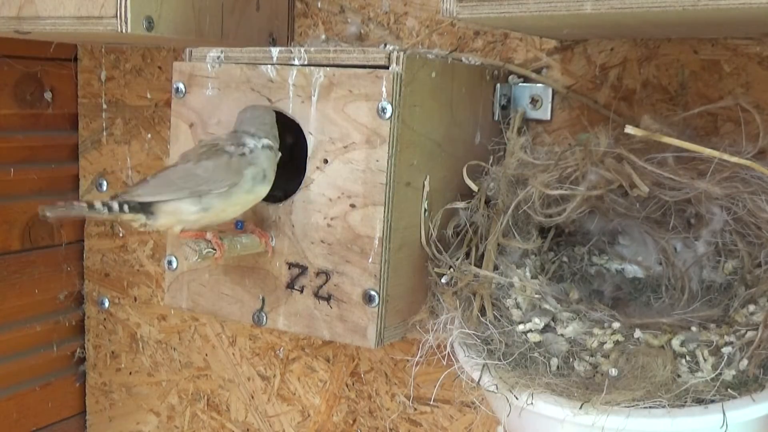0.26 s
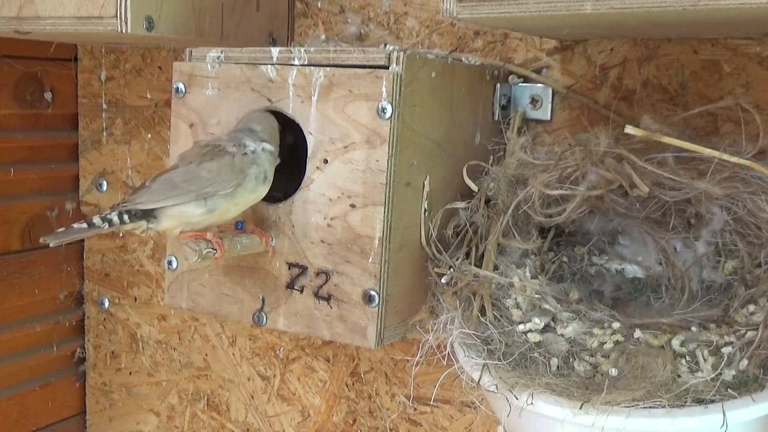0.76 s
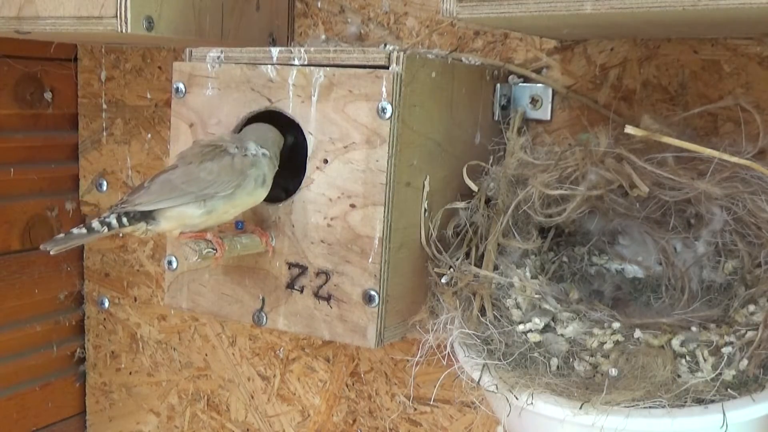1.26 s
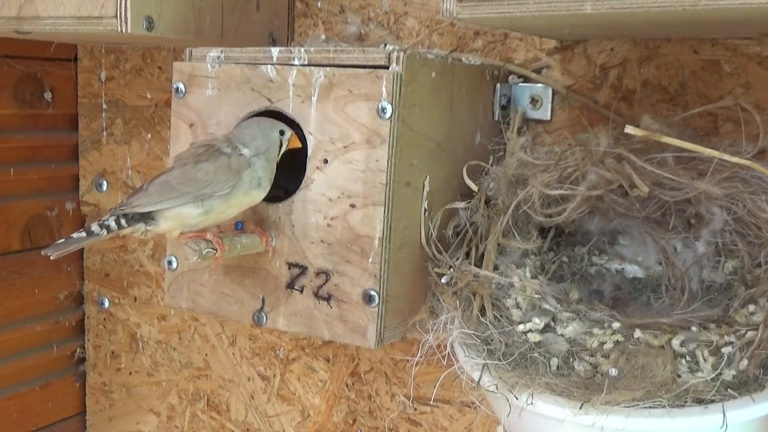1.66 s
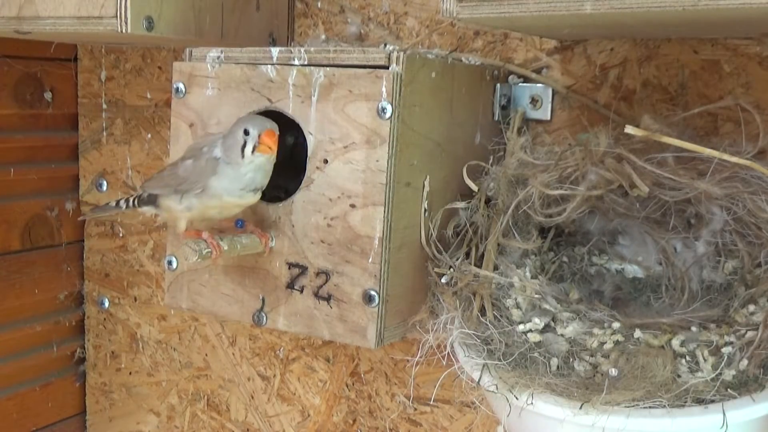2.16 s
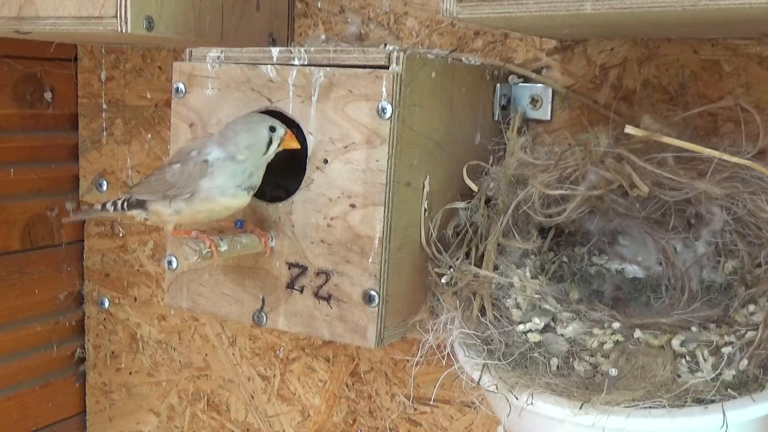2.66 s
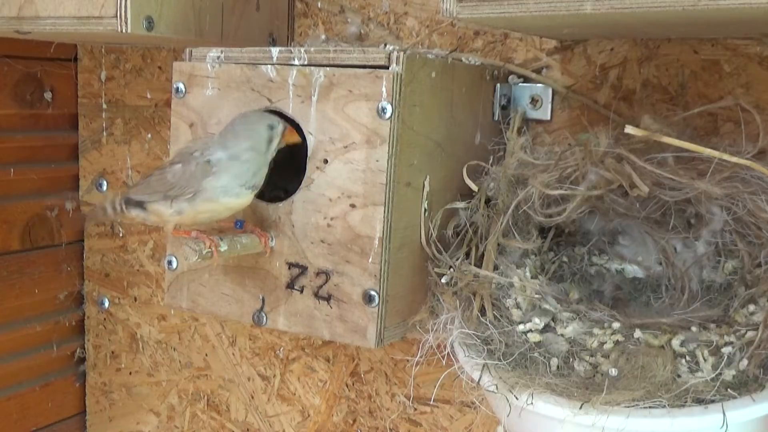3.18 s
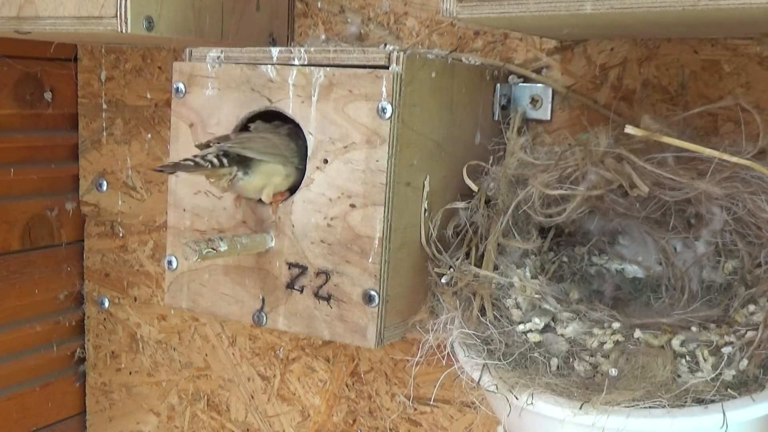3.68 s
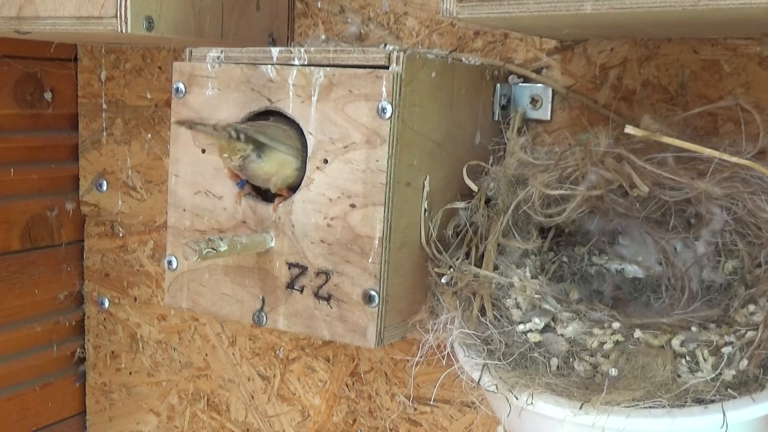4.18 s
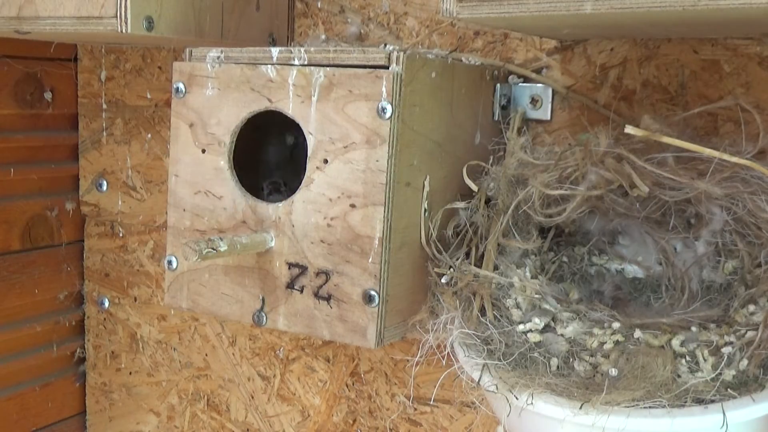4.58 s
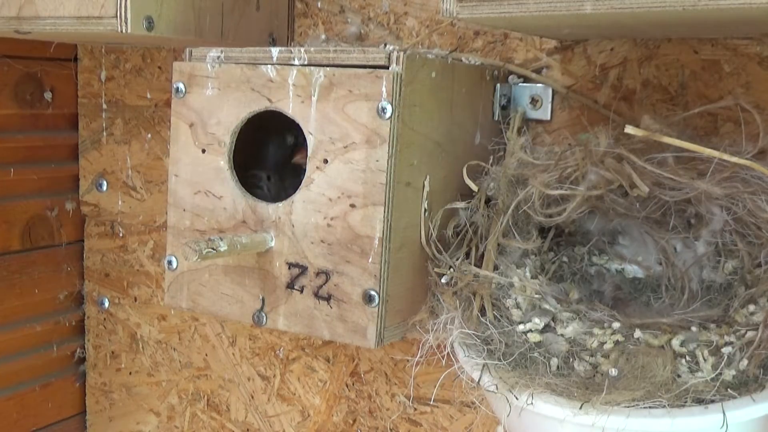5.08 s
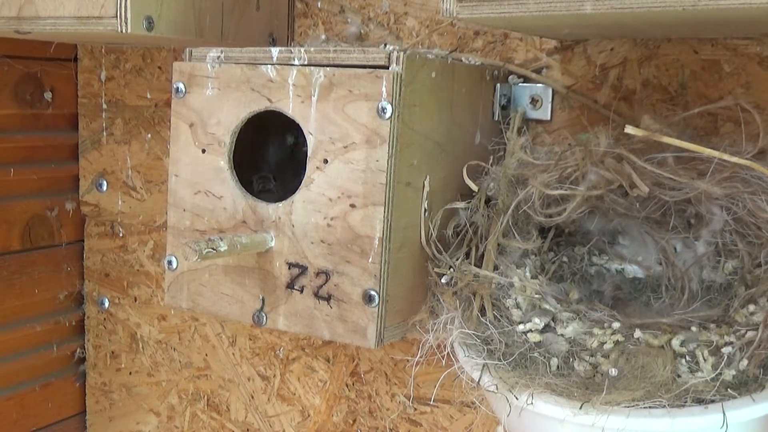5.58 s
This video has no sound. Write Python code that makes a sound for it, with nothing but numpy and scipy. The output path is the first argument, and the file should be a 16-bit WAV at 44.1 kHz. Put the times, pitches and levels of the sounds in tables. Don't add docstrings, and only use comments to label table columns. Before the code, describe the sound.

Close stereo pickup of small finches indoors: a broken two-step cry early, ragged low squawks, tiny peeps, then a sharp burst of shrieks and scolds midway. Raspy chick begging pulses almost throughout. Straw scuffs and woody ticks accompany a bird entering a nest box, followed by nasal calls, a clear drawn-out buzz and a falling reedy whistle. Low fan hum and blurred distant birds stay underneath.

```python
import sys
import numpy as np
from scipy import signal
from scipy.fft import rfft, irfft, next_fast_len
from scipy.io import wavfile
from scipy.ndimage import uniform_filter1d

SR = 44100
rng = np.random.default_rng(int(sys.argv[2]) if len(sys.argv) > 2 else 0)


def amp(db):
    return 10 ** (np.asarray(db, float) / 20)


def write(x):
    x = np.atleast_2d(x).T
    wavfile.write(sys.argv[1], SR, np.round(np.clip(x, -1, 1) * 32767).astype(np.int16))


N = 257544


def evened(x):
    return x / np.sqrt(np.mean(x ** 2) + 1e-20)


def read(points, hz):
    f, value = np.transpose(points)
    return np.interp(np.log(hz + 1), np.log(f + 1), value)


def colour(x, points):
    size = next_fast_len(len(x))
    gain = amp(read(points, np.fft.rfftfreq(size, 1 / SR)))
    return irfft(rfft(x, size) * gain, size)[:len(x)]


def wobble(n, hz):
    span = max(int(SR / hz / 2), 1)
    smooth = uniform_filter1d(uniform_filter1d(rng.standard_normal(9000), span), span)
    return evened(smooth)[np.arange(n) % 9000]


def swell(length, rise, fall):
    n = max(int(length * SR), 50)
    u = np.arange(n) / n
    return np.sin(np.pi / 2 * np.clip(np.minimum(u / rise, (1 - u) / fall), 0, 1)) ** 2, u


def perform(rows, voice, *settings):
    track = np.zeros(N)
    for start, *row in rows:
        sound = voice(*row, *settings)
        part = track[max(round(start * SR), 0):][:len(sound)]
        part += sound[:len(part)]
    return track


def patchy(points, patch_db, grain_db):
    frames = N // 128 + 5
    a, b, patches = rng.standard_normal((frames, 257, 3)).T
    patches = evened(uniform_filter1d(uniform_filter1d(patches, 5, 0), 16, 1))
    flicker = evened(uniform_filter1d(rng.standard_normal(frames), 4))
    z = (a + 1j * b) * amp(patch_db * patches + grain_db * flicker)
    noise = signal.istft(z, nperseg=512, noverlap=384)[1][:N]
    return evened(colour(noise, points))


def loudness(x):
    span = int(0.046 * SR)
    return np.sqrt(abs(uniform_filter1d(x ** 2, span, origin=span // 4)))


# frequency in Hz, density in dB per Hz.
AIR_SPECTRUM = [(5, 13), (10, -3), (80, -19), (125, -4.5), (185, -20.5), (770, -15.5), (1050, -11.5),
                (1500, -15), (2300, -32.5), (6000, -30.5), (15500, -75)]


def room_tone():
    return amp(-40) * patchy(AIR_SPECTRUM, 3.4, 0.98)


def fan_line(hz, width_hz):
    shape = ((-2, -50), (-.5, -6), (0, 0), (.5, -6), (2, -50))  # (widths from the centre, dB)
    return evened(colour(rng.standard_normal(N), [(hz + step * width_hz, db) for step, db in shape]))


# frequency in Hz, width in Hz, level in dB.
FAN_LINES = [(49.5, 14, -50), (23.53, 1.67, -41)]


def fan():
    t = np.arange(N) / SR
    sway_db = 3.5 * np.sin(2 * np.pi * t / 6.7 + 2.68)
    hum = amp(-48.5 + sway_db) * fan_line(135, 4.2)
    return hum + sum(amp(db) * fan_line(hz, width_hz) for hz, width_hz, db in FAN_LINES)


# frequency in Hz, density in dB per Hz.
STRAW_SPECTRUM = [(88, 1.5), (150, -15), (275, -5), (343, -15), (505, -3.5), (1050, -7), (1500, -14.5),
                  (1950, -9.5), (3300, -120)]
# middle in seconds, spread in seconds, straw level in dB,
# box boom level in dB.
SCUFFLES = [
    (.42, 0.19, -37.5, -48),
    (1.15, 0.16, -42, -61),
    (2.65, 0.094, -55, -42.5),
    (3.6, 0.11, -38.5, -67),
    (3.95, 0.3, -39, -40.5),
    (5.25, 0.13, -70, -57),
]


def nest_box():
    t = np.arange(N) / SR
    straw, boom = amp(-47.5), amp(-48.5)
    for middle, spread, straw_db, boom_db in SCUFFLES:
        move = np.exp(-((t - middle) / spread) ** 2)
        straw = straw + move * amp(straw_db)
        boom = boom + move * amp(boom_db)
    hollow = [(30, -24), (50, -1.0), (82, 12.5), (115, 2.0), (150, -25.5)]
    box = evened(colour(rng.standard_normal(N), hollow))
    return boom * box + straw * patchy(STRAW_SPECTRUM, 3.6, 2.6)


# frequency in Hz, density in dB per Hz.
FLOCK_SPECTRUM = [(820, -41), (1400, -20), (1890, 0.5), (3050, 5), (3760, 2.5), (5200, -2.5), (6760, 1),
                  (11400, -120)]
# time in seconds, level in dB.
UNREST = [(0, -43), (.2, -42), (.63, -42), (.77, -48), (1.1, -37.5), (1.3, -48.5), (1.57, -32.5),
          (1.9, -41), (2.13, -36.5), (2.55, -42), (3.35, -35.5), (4.54, -38.5), (4.6, -31), (4.75, -50),
          (5.0, -30), (5.55, -49.5), (5.84, -44)]


def far_flock(scolds):
    t = np.arange(N) / SR
    level = amp(np.interp(t, *np.transpose(UNREST))) + amp(-13.5) * loudness(scolds)
    return amp(-3.0) * level * patchy(FLOCK_SPECTRUM, 5.74, 1.1)


# frequency in Hz, density in dB per Hz.
FAR_CHICK_SPECTRUM = [(4000, -21), (5500, 3), (7500, 3.5), (10000, -2), (13500, -5), (15000, -26),
                      (15700, -32)]
PAUSES = [.64, .775, 1.555, 1.84, 2.56, 4.535, 5.54, 5.78]


def far_chicks(rasps, scolds):
    t = np.arange(N) / SR
    level = amp(-41) + amp(-18.5) * loudness(rasps) + amp(-18) * loudness(scolds)
    pauses = sum(np.exp(-((t - s) / 0.019) ** 2) for s in PAUSES)
    return amp(2.5) * level * amp(-20 * pauses) * patchy(FAR_CHICK_SPECTRUM, 5.0, 0.38)


def background(rasps, scolds):
    return room_tone() + fan() + nest_box() + far_flock(scolds) + far_chicks(rasps, scolds)


def chirp(length, first_hz, last_hz, db, favoured, rough, spread_db, floor_db, breath_db, rise=0.11):
    shape, u = swell(length, rise, 0.2)
    if last_hz > first_hz:
        glide = np.sin(np.minimum(u / 0.6, 1) * np.pi / 2)
    else:
        glide = u ** 1.555
    hz = first_hz + (last_hz - first_hz) * glide
    hz = hz * (1 - 0.074 * rough * np.exp(-u / 0.043))
    turns = np.cumsum(hz + rough * 75 * wobble(len(u), 200)) / SR
    k = np.arange(1, 7)[:, None]
    gain = amp(-np.minimum(spread_db * (k - favoured) ** 2, floor_db)) * (k * last_hz < 14300)
    chop = np.array([1 - .45 * rough + rough * wobble(len(u), 240 + .04 * n * first_hz) for n in k[:, 0]])
    tone = evened((gain * chop * np.cos(2 * np.pi * k * turns)).sum(0))
    breath_spectrum = [(1500, -35), (2500, 14.5), (12500, 21.0), (14500, -33)]
    breath = colour(rng.standard_normal(9000), breath_spectrum)[:len(u)]
    return amp(db) * shape * (tone + amp(breath_db) * breath)


# start in seconds, length in seconds, first pitch in Hz,
# last pitch in Hz, level in dB.
DISTANT = [
    (1.55, 0.02, 3260, 3300, -33),
    (.7, 0.026, 4140, 4160, -49),
    (2.208, 0.028, 3400, 3420, -31),
    (3.415, 0.038, 3480, 3260, -24.5),
    (4.6, 0.057, 3060, 3090, -37),
    (5.63, 0.09, 3480, 3030, -39),
    (5.7, 0.041, 2880, 2290, -39.5),
]


def distant_whistles():
    return perform(DISTANT, chirp, 0.2, 0.0, 9., 32, -30)


# start in seconds, length in seconds, first pitch in Hz,
# last pitch in Hz, level in dB.
SHRIEKS = [
    (1.735, 0.028, 3300, 2920, -33.5),
    (2.753, 0.038, 5900, 6200, -15),
    (2.823, 0.035, 6190, 6000, -13.5),
    (3.355, 0.062, 4470, 4615, -21.5),
    (3.52, 0.016, 3960, 4440, -25),
    (3.805, 0.024, 5800, 5850, -29.5),
    (4.105, 0.033, 5600, 5300, -29.5),
]
# start in seconds, length in seconds, first pitch in Hz,
# last pitch in Hz, level in dB.
SQUEAKS = [
    (.257, .012, 12500, 12300, -30),
    (1.021, .04, 6950, 7300, -29),
]


def shrieks():
    return sum(perform(rows, chirp, 0.2, 1.7, 4.5, 38, -34) for rows in (SHRIEKS, SQUEAKS))


def scold(length, first_hz, last_hz, db, *style):
    return chirp(length, first_hz, last_hz, db, (4170 / first_hz) ** 1.48, *style)


# start in seconds, length in seconds, first pitch in Hz, last pitch in Hz,
# level in dB.
SCOLDS = [
    (.8, 0.021, 3505, 3040, -30.5),
    (.984, 0.013, 3480, 3460, -21.5),
    (2.767, 0.018, 3010, 2850, -37),
    (2.755, 0.017, 5100, 5280, -22.5),
    (2.96, 0.054, 2527, 2703, -11),
    (3.02, 0.03, 2565, 2727, -14),
    (3.043, 0.044, 2186, 2103, -13),
    (3.082, 0.062, 2222, 2050, -16),
    (5.125, 0.015, 3760, 4000, -26),
]


def scolds_from_afar():
    return perform(SCOLDS, scold, 0.62, 4.4, 9., -22)


# start in seconds, peak in dB, ring in Hz.
TICKS = [
    (0.259, -29.5, 487),
    (1.266, -25, 540),
    (1.919, -28, 151),
    (2.729, -25.5, 238),
    (3.529, -37, 151),
    (3.849, -29, 875),
    (3.929, -22.5, 159),
    (4.049, -43, 794),
]


def tick(db, hz):
    t = np.arange(2500) / SR
    ring = np.sin(2 * np.pi * hz * t) * amp(-60 * t / 0.022)
    scratch = 0.22 * rng.standard_normal(2500) * amp(-60 * t / 0.0069)
    return amp(db) * (ring + scratch)


# start in seconds, length in seconds, first pitch in Hz, last pitch in Hz,
# level in dB.
WHISTLES = [
    (1.05, 0.051, 3600, 4080, -31.5),
    (1.082, 0.035, 4056, 3650, -24.5),
    (1.57, 0.03, 5130, 4800, -35.5),
    (2.56, 0.075, 2460, 2796, -38),
    (3.2, 0.023, 1090, 920, -35),
    (4.563, .034, 3020, 3066, -28),
    (4.655, 0.033, 2640, 2640, -37),
    (5.742, 0.061, 2260, 2070, -34),
    (5.808, 0.063, 8700, 7900, -27),
]
# start in seconds, length in seconds,
# first pitch in Hz, last pitch in Hz, level in dB.
REEDY = [
    (1.016, 0.039, 2380, 2400, -27.5),
    (.125, 0.057, 2900, 3100, -30.5),
    (.55, 0.041, 3730, 3300, -40),
    (1.565, 0.035, 2120, 1950, -33),
    (.87, 0.054, 1530, 1500, -36.5),
    (2.238, 0.028, 2200, 2020, -33.5),
    (4.6, 0.0254, 2900, 3250, -24.5),
    (4.12, 0.043, 4100, 3990, -30),
    (5.81, 0.074, 2930, 2400, -22.5),
]


def whistles():
    clear = (0.26, 7.0, 25, -31)
    return perform(WHISTLES, chirp, 0.2, *clear) + perform(REEDY, chirp, 1.29, *clear)


# start in seconds, length in seconds, first pitch in Hz, last pitch in Hz,
# level in dB.
YELPS = [
    (1.548, .026, 3230, 3250, -36),
    (2.677, 0.034, 2240, 2370, -21),
    (2.684, 0.022, 3010, 2840, -22),
    (2.897, 0.0294, 2016, 2227, -15.5),
    (3.154, 0.037, 2260, 2640, -14),
    (3.18, 0.042, 2066, 2074, -17),
    (3.238, 0.045, 2580, 2910, -16),
    (4.533, 0.036, 2920, 2994, -33.5),
    (5.79, 0.032, 2090, 2970, -37),
]


def yelps():
    return perform(YELPS, scold, .55, 3.5, 12, -25, 0.096)


# start in seconds, length in seconds, first pitch in Hz,
# last pitch in Hz, level in dB.
CRIES = [
    (.436, 0.047, 3150, 3210, -17),
    (.463, 0.056, 3520, 3560, -18.5),
]


def broken_cry():
    return perform(CRIES, chirp, 1.5, 0.8, 4.0, 20, -32, 0.14)


# start in seconds, length in seconds, pitch in Hz, level in dB, treble in dB.
SQUAWKS = [(0., 0.058, 1145, -22.5, -19), (.265, 0.058, 1061, -28, -5), (.4, 0.078, 1061, -27, -15),
           (1.262, 0.027, 905, -29.5, -22), (1.483, 0.032, 1020, -26.5, -7), (1.94, 0.072, 1287, -36, -23),
           (2.065, 0.075, 1068, -24, -8), (2.276, 0.071, 1170, -20, -10.5), (2.36, 0.018, 1523, -30.5, -6),
           (2.49, 0.073, 1192, -38, -24), (3.23, 0.047, 1021, -24.5, 2), (4.44, 0.051, 1230, -33, -19)]


def squawk(length, hz, db, treble_db):
    throat_hz = 2640
    shape, u = swell(length, 0.018, 0.34)
    ragged = np.clip((u - .08) / 0.34, 0, 1)
    drop = 1 - .7 * np.sin(np.pi / 2 * u ** 1.1) ** 2
    turns = np.cumsum(hz * drop * (1 + .05 * ragged * wobble(len(u), 500))) / SR
    pulses = evened(sum(np.cos(2 * np.pi * k * turns) for k in range(1, 12)))
    puffs = evened(np.exp(-(turns % 1) / 1.5) * rng.standard_normal(9000)[:len(u)])
    throat = [(500, -30), (1000, -9), (0.56 * throat_hz, -7), (throat_hz, 0), (1.49 * throat_hz, -2),
              (6500, treble_db), (12500, treble_db - 1.5), (15500, treble_db - 18)]
    rattle = evened(colour(pulses + .8 * puffs, throat))
    tone = 0.54 * (1 - ragged) * np.cos(2 * np.pi * turns)
    return -amp(db) * shape * (tone + ragged ** 0.36 * rattle)


# frequency in Hz, gain in dB.
NASAL_THROAT = [(500, -12.5), (1050, 2), (1600, -4), (2200, -1), (4500, 2.5), (5500, -4.5), (8000, 8)]


def nasal(length, hz, db, second, first, glide, flutter):
    shape, u = swell(length, .2, .15)
    turns = np.cumsum(hz * np.interp(u, *glide) * (1 + .004 * wobble(len(u), 60))) / SR
    k = np.arange(1, 15)[:, None]
    lift = 1 + 2.03 * np.exp(-((k - first) / 0.88) ** 2) + 1.9 * np.exp(-((k - second) / 0.45) ** 2)
    lift = lift * amp(-7. * np.clip(k - second - 1, 0, 3))
    waver = np.array([1 + flutter * wobble(len(u), 126) for _ in k])
    overtones = np.cos(2 * np.pi * k * turns + 0.378 * k ** 2)
    stack = (lift * waver * amp(read(NASAL_THROAT, k * hz)) * overtones).sum(0)
    return amp(db) * shape * evened(stack)


# start in seconds, length in seconds, top pitch in Hz,
# level in dB, upper favoured overtone as a number.
RISING = [(.07, 0.082, 538, -40, 5.1), (.2, 0.12, 543, -36.5, 5.4), (.39, 0.066, 523.5, -34.5, 6.2),
          (.525, 0.07, 526, -36.5, 6.6), (1.135, 0.11, 519, -35.5, 6.7), (1.65, 0.1, 536, -36, 7.2),
          (1.83, 0.048, 526, -42.5, 8.4), (2.01, 0.075, 522, -40, 5), (2.8, 0.18, 533, -36.5, 8.1),
          (3.08, 0.0773, 540, -29.5, 5.7), (3.49, 0.097, 544, -31.5, 6.3), (3.585, 0.0734, 548, -28.5, 6.5),
          (3.745, 0.089, 528.5, -29, 5.5), (3.875, 0.085, 543.4, -29.5, 5.5), (4.01, 0.13, 536.4, -31, 6.4),
          (4.115, 0.056, 524, -33.5, 8.3), (4.96, 0.052, 541.5, -31.5, 6)]
# start in seconds, length in seconds, top pitch in Hz,
# level in dB, upper favoured overtone as a number.
SAGGING = [
    (.785, 0.036, 650, -34.5, 6),
    (1.41, 0.093, 608, -45, 8.1),
    (2.62, 0.11, 618, -41.5, 3.5),
    (4.56, 0.07, 612, -38, 6),
    (5.012, 0.054, 646, -28, 6.5),
]
# start in seconds, length in seconds, top pitch in Hz,
# level in dB, upper favoured overtone as a number.
ARCHING = [
    (4.365, 0.101, 662, -30.5, 6),
    (5.43, 0.081, 589, -46, 8.3),
]
# start in seconds, length in seconds, top pitch in Hz, level in dB,
# upper favoured overtone as a number.
LONG_CALL = [
    (5.15, .16, 511.5, -24, 8.9),
]


def finches():
    rise = ([0, .25, 0.443, 0.768, 0.95], [.89, .92, 1, 0.99, 0.94])
    sag = ([0, .3, 0.95], [.99, 1, .92])
    arch = ([0, .3, 0.745, 0.98], [.92, 1, 0.99, 0.9])
    drawn_out = ([0, .15, 0.298, .8, 0.98], [.86, .93, 1.01, 0.99, 0.93])
    return (perform(RISING, nasal, 3.85, rise, .5) + perform(SAGGING, nasal, 4.2, sag, .15)
            + perform(ARCHING, nasal, 4.66, arch, .45) + perform(LONG_CALL, nasal, 4.92, drawn_out, .12))


# frequency in Hz, density in dB per Hz.
CHICK_THROAT = [(2350, -46), (4000, 5.5), (4180, -4), (5020, -14), (5850, -5.5), (6390, -3), (7190, -3.5),
                (7980, -11), (8630, 6.5), (9860, -3), (10500, -18), (12300, -43), (13000, -16.5)]
# frequency in Hz, width in Hz, lift in dB.
THROAT_RINGS = [(5820, 200, 8), (7510, 440, 11), (8300, 170, 6.5), (10150, 180, 9)]


def rasp(length, db):
    bright_db = -1.5
    shape, u = swell(1.12 * length, .2, .14)
    shape = shape * (0.95 + 0.21 * np.sin(np.pi * u ** 0.85))
    turns = np.cumsum(420 * (1 + 0.13 * wobble(len(u), 300))) / SR
    puffs = 1.8 + np.exp(-(turns % 1) / 0.42)
    hiss = puffs * rng.standard_normal(9000)[np.arange(len(u)) % 9000]
    hiss = colour(hiss, CHICK_THROAT)
    hiss = colour(hiss, [(3500, -20.0), (5000, -bright_db), (9000, bright_db)])
    rings = []
    for hz, width_hz, lift_db in THROAT_RINGS:
        centre = hz * (1 + .02 * rng.standard_normal())
        peak_db = lift_db * rng.uniform(.1, 1.5)
        rings += [(centre - width_hz, 0), (centre, peak_db), (centre + width_hz, 0)]
    return amp(db) * shape * amp(0.28 * wobble(len(u), 28)) * evened(colour(hiss, rings))


# start in seconds, length in seconds, level in dB.
BEGS = [(.53, 0.02, -39), (.68, 0.069, -35.5), (.865, 0.11, -33), (1.13, .11, -30), (1.38, 0.1, -30),
        (1.62, 0.13, -29.5), (1.89, .1, -30), (2.15, 0.092, -30.5), (2.37, 0.1, -32.5), (2.6, 0.093, -31.5),
        (2.85, 0.082, -28.5), (3.1, 0.076, -34), (3.355, 0.064, -37), (3.595, 0.074, -31.5),
        (3.845, 0.089, -29.5), (4.1, 0.085, -33), (4.2, 0.056, -39), (4.35, 0.1, -31.5), (4.58, 0.11, -29),
        (4.85, 0.099, -31), (5.09, 0.097, -32.5), (5.22, 0.19, -44), (5.34, 0.084, -33.5),
        (5.45, 0.049, -39.5), (5.59, 0.12, -33)]


def begging_chicks():
    return perform(BEGS, rasp)


def echo(t60_points, size, gap):
    taps = np.zeros(size)
    at = np.arange(gap, size - 22, 22)
    taps[at + rng.integers(0, 22, len(at))] = rng.choice([-1., 1.], len(at))
    hz, t, z = signal.stft(taps, SR, nperseg=256)
    decay = amp(-60 * t / read(t60_points, hz)[:, None])
    tail = signal.istft(z * decay, SR, nperseg=256)[1]
    return tail / np.linalg.norm(tail)


# frequency in Hz, 60 dB decay time in seconds.
ROOM_DECAY = [(300, 0.4), (2000, 0.14), (6000, 0.22), (12000, 0.041)]


def aviary(near, far):
    walls = echo(ROOM_DECAY, size=16000, gap=150)
    return near + far + signal.fftconvolve(amp(-9) * near + amp(-6.5) * far, walls)[:N]


# frequency in Hz, side minus mid in dB.
PORT_WIDTH = [(30, -32), (70, -17), (290, -25.5), (1400, -18), (3100, -17.5), (5000, -14.5), (6800, -12),
              (9000, -8.5), (10500, -10.5), (12000, -18), (15000, -36)]


def microphones(mid):
    scatter = echo([(300, 0.05), (9000, 0.05)], size=9000, gap=5)
    side = colour(signal.fftconvolve(mid, scatter)[:N], PORT_WIDTH)
    side = side - colour(mid, [(30, -26), (60, -15), (150, -16), (300, -30), (600, -50)])
    return np.array([mid + side, mid - side])


def scene():
    far = distant_whistles() + shrieks() + scolds_from_afar()
    near = perform(TICKS, tick) + whistles() + yelps() + broken_cry() + perform(SQUAWKS, squawk) + finches()
    rasps = begging_chicks()
    return microphones(aviary(rasps + near, far) + background(rasps, far))


# frequency in Hz, gain in dB.
BAND_LIMIT = [(15500, 0), (15800, -45)]


def recorder_input(dry):
    power_db = 10 * np.log10(abs(uniform_filter1d((dry ** 2).mean(0), 600)) + 1e-12)
    fall = np.arange(N) * 49.0 / SR
    held_db = np.maximum.accumulate(power_db + fall) - fall
    over_db = np.maximum(held_db + 15.5, 0)
    ducked = dry / amp(0.81 * uniform_filter1d(over_db, 300))
    rounded = .8 * np.tanh(ducked / .8)
    return np.array([colour(x, BAND_LIMIT) for x in rounded])


def band_limit(x):
    return signal.sosfilt(signal.butter(12, 15760, fs=SR, output="sos"), x)


def record(dry):
    finished = recorder_input(dry)
    return band_limit(finished)


dry = scene()
out = record(dry)
write(out)
```